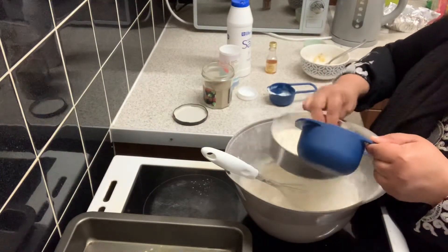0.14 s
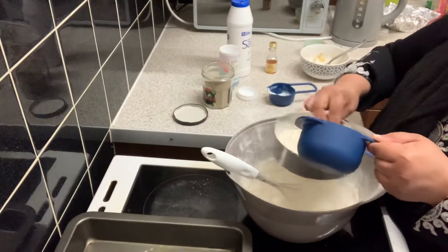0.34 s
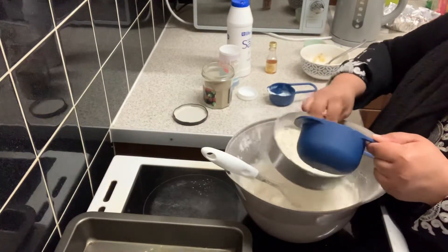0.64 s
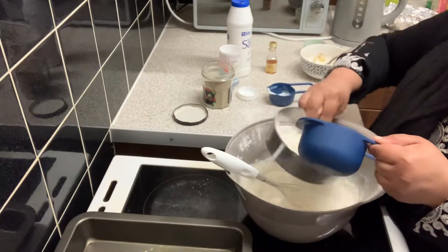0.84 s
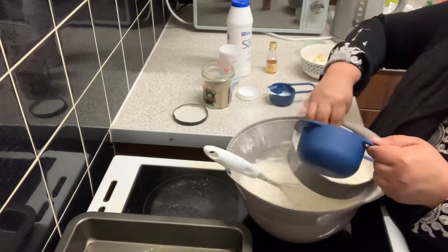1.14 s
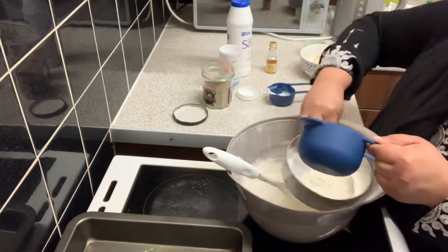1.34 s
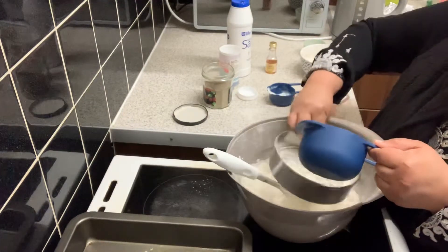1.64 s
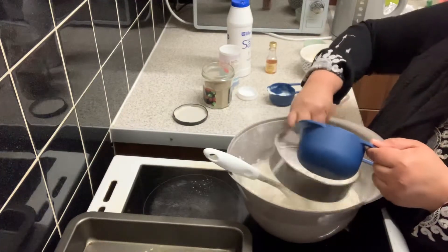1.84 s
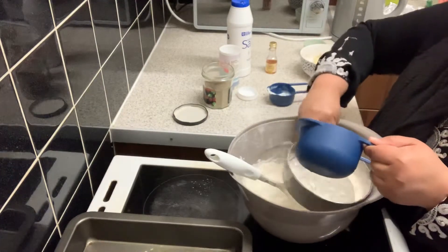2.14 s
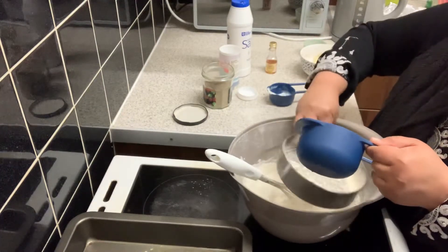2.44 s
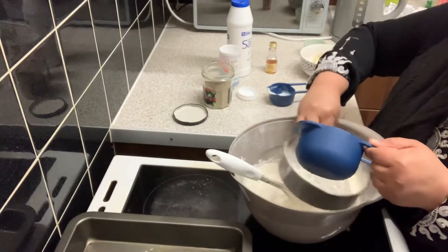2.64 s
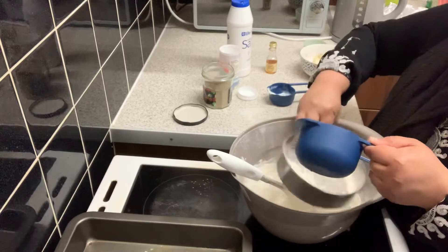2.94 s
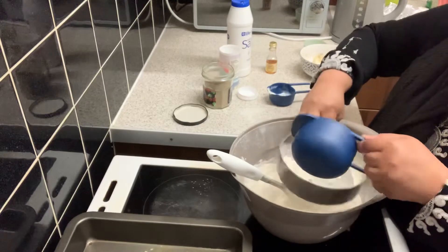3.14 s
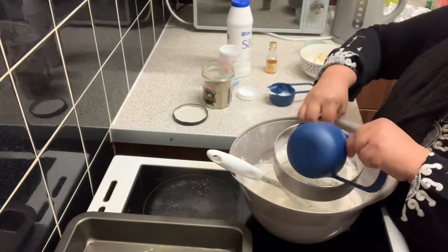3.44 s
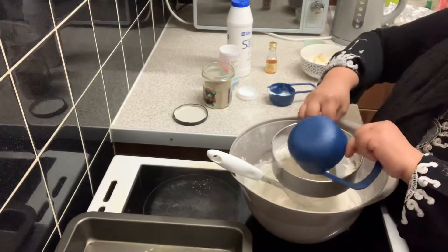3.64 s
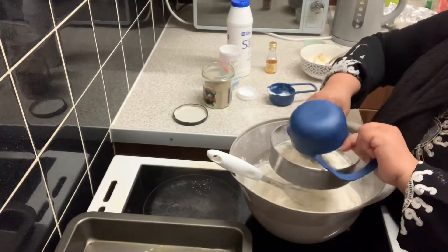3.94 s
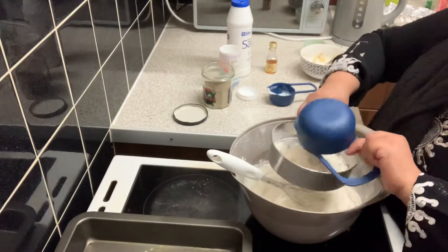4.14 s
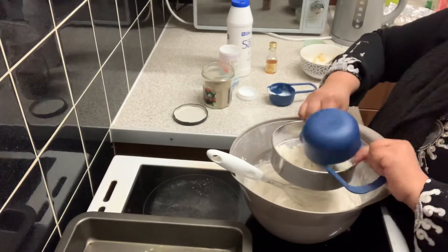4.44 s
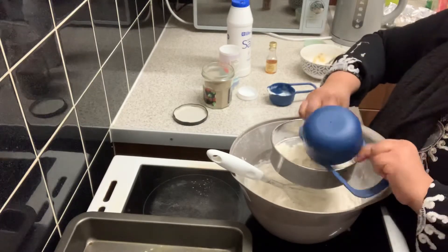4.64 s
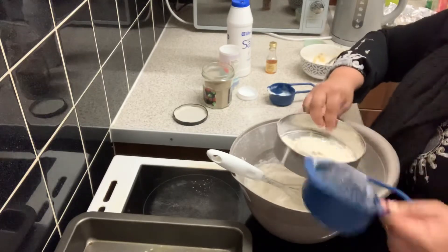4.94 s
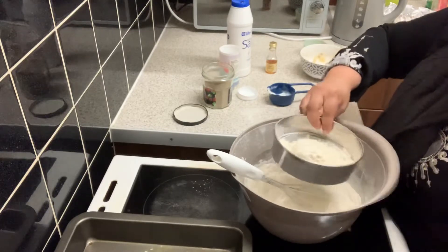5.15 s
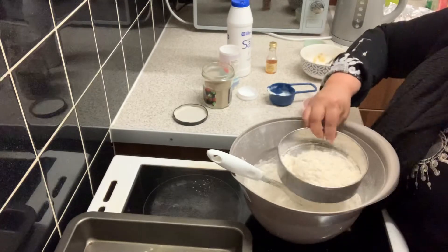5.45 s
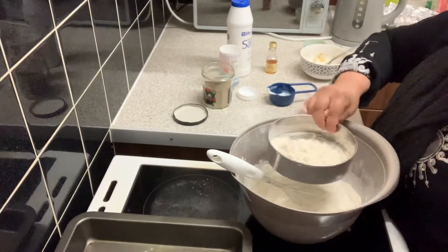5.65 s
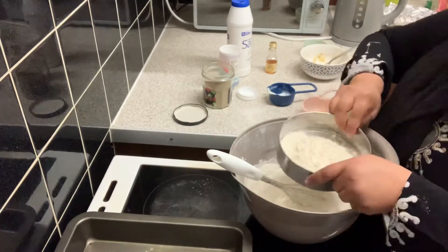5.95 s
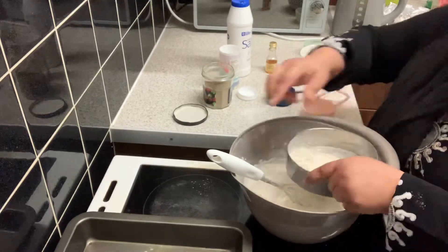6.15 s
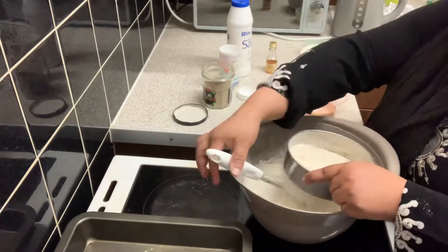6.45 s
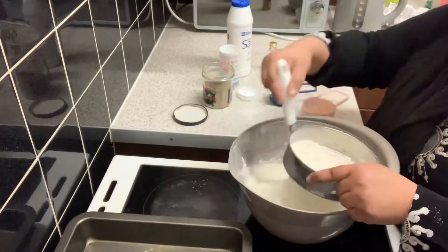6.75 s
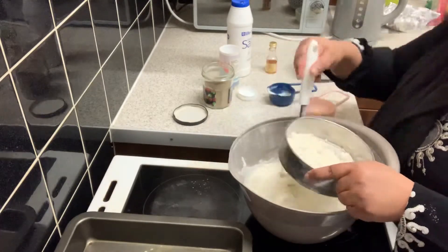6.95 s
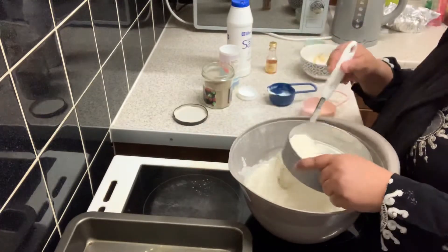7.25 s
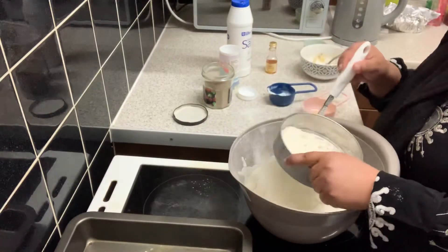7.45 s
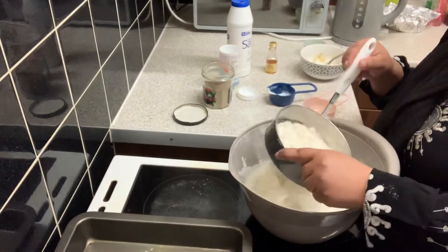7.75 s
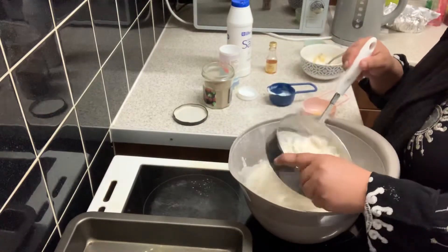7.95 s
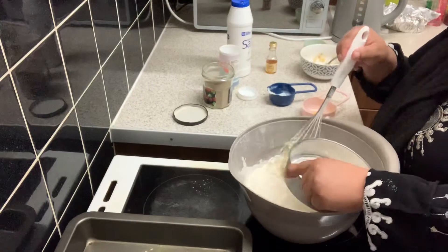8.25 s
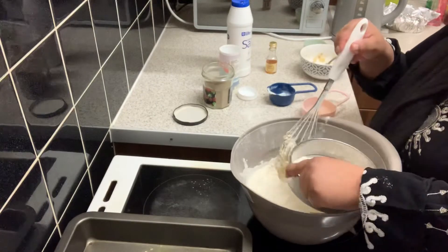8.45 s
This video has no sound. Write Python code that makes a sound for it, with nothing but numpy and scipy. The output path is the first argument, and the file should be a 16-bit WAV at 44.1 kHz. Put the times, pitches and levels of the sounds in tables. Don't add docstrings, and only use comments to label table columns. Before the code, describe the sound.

Close microphone in a small tiled kitchen, with a faint low household hum throughout. From 0 to 1.1 seconds, very quiet back-and-forth flour hiss and soft rubbing through a sieve. At 1.1 a sharp clack with a quick rattle starts the knocking; from 1.3 to 3.05 a plastic pan hits the sieve about every 0.2 seconds, dry and hollow, each blow followed by a low bowl thud, the last one weak. A light tap at 3.3, a pause, an edge slip at 4.25, then two loud taps at 4.43 and 4.6, the second hardest. At 5.2 the pan lands hard on the counter, bouncing and rocking to rest by 5.55. Faint finger nudges and flour rustle until 7.4. A clear whisk tap at 7.57, a light double tap at 7.78, a brief wire scrape at 7.97, then handle knocks at 8.2 and, louder, 8.38, ending in a soft rub near 8.6.

```python
import sys
import numpy as np
from scipy import signal
from scipy.fft import rfft, irfft, next_fast_len
from scipy.io import wavfile
from scipy.ndimage import uniform_filter1d

SR = 44100
rng = np.random.default_rng(int(sys.argv[2]) if len(sys.argv) > 2 else 0)


def to_wav(s):
    ch = np.atleast_2d(s).T
    pcm = np.round(np.clip(ch, -1, 1) * 32767)
    wavfile.write(sys.argv[1], SR, pcm.astype(np.int16))


def undo_db(level):
    steps = np.asarray(level, float) / 20
    return 10 ** steps


N = 378819

# (time [s], crack peak [dB], thud [dB], extra brightness [dB/octave], share to walls [dB])
FIRST_SHAKE = [
    (1.0895, -12, -23.5, -6.5, -4),
    (1.096, -20, -42, -1.5, -6),
    (1.118, -22, -44, 1, -4),
    (1.154, -28.5, -46.5, 1, -7),
]
SHAKES = [
    (1.31, -16.5, -25, 0, -6.5),
    (1.512, -17.5, -34, -0.5, -8),
    (1.693, -11.5, -27, -0.5, -9),
    (1.891, -13, -25.5, -0.5, -8),
    (2.095, -12.5, -31.5, 0.5, -9.5),
    (2.283, -13.5, -31.5, -1, -8.5),
    (2.467, -14.5, -30, 1.5, -7),
    (2.66, -14, -28.5, 0.5, -8.5),
    (2.854, -11.5, -27, 1, -8.5),
    (3.057, -22.5, -38.5, -2.5, -9.5),
]
# (frequency [Hz], level [dB per Hz])
FULL_PAN_COLOUR = [(310, -39), (520, -6), (2820, -4), (6040, -15), (7380, -14), (10700, -22), (13900, -28),
                   (16000, -60)]
PAN_COLOUR = [(310, -30), (520, 1), (664, 1.5), (1110, -3.5), (2550, -8), (6580, -33), (10300, -36),
              (12000, -40.5), (14300, -38), (16000, -70)]
# (frequency [Hz], width [Hz], level [dB])
FULL_PAN_CLACK = [(1640, 2200, 2), (2390, 596, 2), (3100, 780, -1)]
PAN_CLACK = [(1160, 350, 5), (1457, 552, 11.7), (3350, 820, 1.3)]


def shaken_pan():
    first = knocks(FIRST_SHAKE, FULL_PAN_COLOUR, FULL_PAN_CLACK, chatter_s=0.013, chatter_db=-23,
                   broad_db=-4, deep_db=11, land_s=.0012, late_s=0.0055)
    beat = knocks(SHAKES, PAN_COLOUR, PAN_CLACK, chatter_s=0.0031, chatter_db=-20, broad_db=-8, deep_db=5,
                  land_s=0.0008, order=3, rebound_db=-4, clack_sent_db=-8.5, onset_s=0.00079)
    return first + beat


# (time [s], crack peak [dB], thud [dB], extra
# brightness [dB/octave], share to walls [dB])
LIGHT_TAPS = [
    (3.311, -23, -53, -2.2, -5.5),
    (7.409, -43.5, -64.5, -2, -13),
]
SLIP = [
    (4.244, -21.5, -31, -2.2, -4.5),
]
RIM_TAP = [
    (4.428, -8, -47.5, -2, -8.5),
]
HARD_TAP = [
    (4.609, -6, -53, -2, -8),
]
# (frequency [Hz], level [dB per Hz])
LIP_COLOUR = [(240, -25.5), (400, -1), (826, -13.5), (1220, -9), (2180, -11.5), (2800, -7.5), (3370, -25.5),
              (7170, -20), (9920, -22.5), (12500, -35.5), (16000, -42.5)]
EDGE_COLOUR = [(310, -31.5), (520, -8), (2030, -19), (2180, -20.5), (3400, -24.5), (4340, -22.5),
               (10100, -37), (16000, -69)]
RIM_COLOUR = [(260, -18.5), (450, -13), (771, -9.5), (908, -12.5), (1780, -18.5), (3230, -27.5),
              (6930, -22.5), (11200, -20), (14000, -29.5), (16000, -90)]
EMPTY_PAN_COLOUR = [(260, -26.5), (450, -13), (589, -7), (654, -15), (964, 0.5), (2100, -26), (4840, -28),
                    (7360, -26.5), (9770, -24.5), (12200, -39), (14400, -39.5), (16000, -72.5)]
# (frequency [Hz], width [Hz], level [dB])
LIP_CLACK = [(1280, 540, -0.5), (2910, 390, -3), (4240, 710, -6.5)]
EDGE_CLACK = [(2380, 520, -5), (4580, 970, 2), (5200, 510, -12.5)]
RIM_CLACK = [(910, 310, 0.5), (1800, 300, -12), (2780, 170, -17), (4440, 380, -7.5), (10330, 3000, -3.5)]
EMPTY_PAN_CLACK = [(915, 360, 1), (1150, 81.8, -2.5), (1270, 79, -23), (1868, 230, -20.5), (2810, 400, -20),
                   (4700, 1300, -13.5)]


def tapped_rim():
    light = knocks(LIGHT_TAPS, LIP_COLOUR, LIP_CLACK, chatter_s=0.0027, chatter_db=-19, broad_db=-2.5,
                   clack_sent_db=-6.5, ring_db=-31.5, deep_db=8.5)
    slip = knocks(SLIP, EDGE_COLOUR, EDGE_CLACK, chatter_s=0.0059, chatter_db=-20, broad_db=-3.5,
                  deep_db=12.5, clack_sent_db=-8.5)
    rim = knocks(RIM_TAP, RIM_COLOUR, RIM_CLACK, chatter_s=0.0033, chatter_db=-14, broad_db=-6.5,
                 ring_db=-45.5, clack_sent_db=-8, smear_db=-39, deep_db=7.5)
    hard = knocks(HARD_TAP, EMPTY_PAN_COLOUR, EMPTY_PAN_CLACK, chatter_s=0.005, chatter_db=-25, broad_db=-4,
                  clack_sent_db=-5.5, ring_db=-42.5, smear_db=-41.5, deep_db=7.5)
    return light + slip + rim + hard


# (time [s], crack peak [dB], thud [dB], extra brightness [dB/octave], share to walls [dB])
SET_DOWN = [
    (5.214, -10.5, -38, -3.5, -5),
]
BOUNCES = [
    (5.24, -34, -43.5, 4, 8),
    (5.268, -18, -37, 0, 3),
    (5.299, -27.5, -50.5, -2.5, 4.5),
    (5.338, -31, -53.5, -2.5, 3.5),
    (5.349, -28.5, -54, 0.5, 1),
    (5.398, -43, -68, -4.5, 10.5),
    (5.42, -42, -69, 3.5, -5),
    (5.492, -44, -51, -1, 3),
    (5.509, -43, -61, -5, 0.5),
    (5.558, -50, -64, 0, -8.5),
]
# (frequency [Hz], level [dB per Hz])
BASE_COLOUR = [(260, -30.5), (450, -5), (485, -8.5), (1170, 3), (1490, -20), (1860, -14.5), (2400, -13.5),
               (5540, -17), (10200, -26.5), (13600, -27.5), (16000, -51.5)]
ROCKING_COLOUR = [(240, -36), (400, -5), (446, -6.5), (1230, -6.5), (1560, -20.5), (3370, -18.5),
                  (6640, -28), (10100, -33), (14100, -43), (16000, -53)]
# (frequency [Hz], width [Hz], level [dB])
BASE_CLACK = [(1210, 110, 3), (1930, 72, -12.5), (3250, 550, -10.5), (5380, 1900, -9.5), (8100, 140, -10.5)]
BOUNCE_CLACK = [(1220, 200, -8), (1786, 690, 5), (3295, 360, -1.5), (5270, 490, -4)]


def pan_set_down():
    base = knocks(SET_DOWN, BASE_COLOUR, BASE_CLACK, chatter_s=0.0033, chatter_db=-9, broad_db=-2.5,
                  deep_db=-8.5, clack_sent_db=-5)
    bounces = knocks(BOUNCES, ROCKING_COLOUR, BOUNCE_CLACK, chatter_s=0.002, chatter_db=-17.5, broad_db=1,
                     clack_sent_db=-6, deep_db=-12.5)
    return base + bounces


# (time [s], crack peak [dB], thud [dB], extra brightness [dB/octave], share to walls [dB])
WHISK_TAPS = [
    (7.574, -22, -51.5, -0.78, -4.5),
    (7.777, -28.5, -60, 1, -4),
    (7.785, -25.5, -58.5, 0.14, -4),
]
WHISK_SCRAPE = [
    (7.969, -33, -66, -4.5, -6),
    (7.975, -30, -49.5, -2.5, 0.5),
    (7.992, -30, -51.5, -3, 1),
]
LAST_KNOCKS = [
    (8.225, -31.5, -46, 4.4, -7),
    (8.376, -16.5, -35, 4.7, -6),
    (8.408, -29.5, -41, 2.5, -11),
    (8.584, -51, -47, 0.42, 0),
]
# (frequency [Hz], level [dB per Hz])
HOOP_COLOUR = [(260, -47), (450, -5), (674, -9), (1750, -4), (2010, -4.5), (3000, -9.5), (3640, -11),
               (6730, -18.5), (9770, -17), (12800, -29), (14600, -17), (16000, -77)]
WIRES_COLOUR = [(260, -26), (450, -7), (818, -14.5), (1810, -6.5), (4700, -17), (5620, -19), (7030, -15),
                (9770, -10), (12600, -22), (16000, -33.5)]
HANDLE_COLOUR = [(310, -34), (520, 10), (1160, 2), (1300, 10.5), (2000, -5.5), (3170, -13.5), (6580, -37.5),
                 (10400, -52.5), (12400, -57), (16000, -48)]
# (frequency [Hz], width [Hz], level [dB])
HOOP_CLACK = [(1320, 140, -9.5), (1670, 310, -7.5), (2945, 290, -2.5), (4760, 820, -9), (6270, 280, -15)]
WIRE_CLACK = [(1790, 230, -3.5), (4350, 1000, -14), (5420, 680, 2.5)]
HANDLE_CLACK = [(1033, 450, 8.5), (1257, 200, 8.5), (1772, 130, -5.5), (2655, 730, 4.5), (3070, 620, -3)]


def whisk():
    taps = knocks(WHISK_TAPS, HOOP_COLOUR, HOOP_CLACK, chatter_s=0.012, chatter_db=-17.5, broad_db=-11,
                  deep_db=7, clack_sent_db=-9)
    scrape = knocks(WHISK_SCRAPE, WIRES_COLOUR, WIRE_CLACK, chatter_s=0.011, chatter_db=-14, broad_db=3.5,
                    deep_db=28)
    handle = knocks(LAST_KNOCKS, HANDLE_COLOUR, HANDLE_CLACK, chatter_s=0.0021, chatter_db=-12.5,
                    broad_db=-8.5, deep_db=18.5, order=3)
    return taps + scrape + handle


# (time [s], crack peak [dB], thud [dB], extra brightness [dB/octave], share to walls [dB])
NUDGES = [
    (5.989, -69.5, -73.5, 4, 2),
    (6.316, -42.5, -46.5, -0.5, 1.5),
    (7.288, -53.5, -60.5, -1.5, -4.5),
]
SCUFF = [
    (6.075, -69, -75, 0, 0),
    (6.1, -69.5, -70, 0, 0),
]
# (frequency [Hz], level [dB per Hz])
FINGERS_COLOUR = [(260, -40), (450, 8), (1070, -2.5), (1700, -7.5), (2910, -3), (6530, -41.5), (12000, -40),
                  (16000, -48)]
# (frequency [Hz], width [Hz], level [dB])
FINGER_CLACK = [(986, 297, -2), (2730, 2050, -5)]
SCUFF_CLACK = [(2050, 250, 0.37), (2300, 210, -2.5)]


def fingers():
    nudges = knocks(NUDGES, FINGERS_COLOUR, FINGER_CLACK, chatter_s=0.0052, chatter_db=-21, broad_db=-3.5,
                    deep_db=24)
    scuff = knocks(SCUFF, FINGERS_COLOUR, SCUFF_CLACK, chatter_s=0.015, chatter_db=-3, broad_db=-4,
                   clack_sent_db=-5, deep_db=3)
    return nudges + scuff


def knocks(events, colour, modes, chatter_s, chatter_db, broad_db, deep_db, smear_db=-36, clack_sent_db=-12,
           ring_db=None, land_s=0.00057, order=2, rebound_db=-40, onset_s=.0003, late_s=.009):
    rebound_s = 0.0068
    out = np.zeros((5, N))
    t = np.arange(int(.08 * SR)) / SR
    lead = np.arange(int(0.014 * SR))
    rise = (lead / len(lead)) ** 0.72
    for s, peak_db, boom_db, tilt_db, wall_db in events:
        body = click(colour, tilt_db)
        chatter = (t / chatter_s) ** .5 * np.exp(-t / chatter_s)
        contact = undo_db(chatter_db) * rng.standard_normal(len(t)) * chatter
        landing = rng.standard_normal(len(t)) * t * np.exp(-t / land_s)
        landing = landing / np.sqrt(np.sum(landing ** 2))
        landing = landing + undo_db(rebound_db) * np.roll(landing, int(rebound_s * SR))
        broad = unit(signal.fftconvolve(contact + landing, body)[:len(t)])
        contact[0] = 1
        voice = []
        for hz, width_hz, db in modes:
            detune, strength = rng.standard_normal(2)
            voice.append((hz * (1 + 0.015 * detune), width_hz, db + 0.67 * strength))
        clack = unit(swell(contact, voice, order))
        crack = clack + undo_db(broad_db) * broad
        size = undo_db(peak_db) / np.abs(crack).max()
        smear = signal.fftconvolve(rng.standard_normal(len(lead)) * rise, band(body, 300, 6700))
        smear = unit(smear[:len(lead)])
        add(out[0], size * crack, s + onset_s)
        add(out[0], undo_db(peak_db + smear_db) * smear, s - len(lead) / SR)
        add(out[1], undo_db(boom_db) * thud(deep_db, late_s), s)
        if ring_db:
            add(out[0], undo_db(peak_db + ring_db) * hoop(), s)
        impulse = 1. * (t == 0)
        sent = unit(np.pad(body, (0, len(t) - len(body))))
        sent = sent + undo_db(clack_sent_db) * unit(swell(impulse, voice, order))
        for feed, share in zip(out[2:], unit(rng.standard_normal(3))):
            add(feed, undo_db(wall_db + 6) * share * size * sent, s)
    return out


def click(colour, tilt_db, size=1024):
    hz = np.arange(size // 2 + 1) * SR / size
    gain_db = at(colour, hz) + (4 + tilt_db) * np.log2((hz + 1) / 1500)
    cep = irfft(np.log(undo_db(np.maximum(gain_db, -90))), size)
    cep[1:size // 2] *= 2
    cep[size // 2 + 1:] = 0
    return irfft(np.exp(rfft(cep)), size)


def swell(contact, modes, order):
    out = 0
    for hz, width_hz, db in modes:
        x = contact
        for k in range(order):
            x = ring(x, hz, width_hz * 1.255 ** k)
        out = out + undo_db(db) / width_hz ** .5 * x
    return out


# (frequency [Hz], width [Hz], t60 [s])
HOOP_RING = (2830, 260, .48)


def hoop():
    hz, width_hz, t60 = HOOP_RING
    t = np.arange(SR // 2) / SR
    tone = ring(ring(rng.standard_normal(len(t)), hz, width_hz), hz, 2 * width_hz)
    return unit(tone) * 1000. ** (-t / t60)


# (frequency [Hz], level [dB], t60 [s])
BOWL = [(61, -12, 1), (80.5, -8.5, 0.64), (115.16, -0.5, 0.34), (131.6, 5.5, 0.099), (154.6, -2.5, 0.046),
        (176, -4.5, 0.062), (182, -9.5, 0.54), (263.3, -11.5, 0.22), (309.6, -12.5, 0.15), (417, -18, 0.2)]


def thud(deep_db, late_s=.009, push_s=0.0049, settle_s=0.082, settle_db=-14):
    t = np.arange(int(.3 * SR)) / SR
    lag = np.maximum(t[:9000] - late_s, 0)
    shake = band(unit(rng.standard_normal(9000)), 89, 340)
    blow = lag / push_s * np.exp(-lag / push_s)
    settle = np.minimum(lag / push_s, 1) * np.exp(-lag / settle_s)
    push = blow * (1 + 24 * shake) + 12 * undo_db(settle_db) * shake * settle
    body = 0
    for hz, db, t60 in BOWL:
        wobble, size = rng.standard_normal(2)
        db = db + 0.88 * size + deep_db * (hz < 100)
        tone = np.sin(2 * np.pi * hz * (1 + 0.037 * wobble) * t)
        body = body + undo_db(db) * np.exp(-np.log(1000) * t / t60) * tone
    y = signal.fftconvolve(np.diff(push), body)
    return y / np.sqrt(np.mean(y[int(late_s * SR):int(.05 * SR)] ** 2))


# (time [s], thud level [dB], extra deep sway [dB])
ROCKS = [
    (1.163, -22, 9.5),
    (6.399, -54.5, 22),
    (6.5, -52.5, 17),
    (8.014, -30, 22.5),
    (8.451, -66, 0),
    (8.519, -44.5, -10),
]


def rocking_bowl():
    out = np.zeros(N)
    for s, db, deep_db in ROCKS:
        add(out, undo_db(db - 11) * thud(deep_db, late_s=.001, push_s=.006), s)
    return out


# (middle time [s], hiss level [dB], rub level [dB])
SWINGS = [
    (0.01, -70.5, -72.5),
    (0.125, -71.5, -76),
    (0.212, -72, -92),
    (0.329, -74.5, -73.5),
    (0.41, -76, -95),
    (0.545, -73, -74),
    (0.742, -69.5, -63),
    (0.83, -83, -72),
    (0.955, -75, -78),
    (1.07, -71.5, -93),
]
# (middle time [s], length [s], hiss level [dB], rub level [dB])
HANDLING = [(4.044, 0.086, -75, -67.5), (5.847, 0.082, -77.5, -84.5), (5.99, .06, -83.5, -73),
            (6.113, 0.12, -82, -75.5), (6.184, 0.12, -75, -82), (6.262, 0.1, -76, -83),
            (6.348, 0.16, -76, -73), (6.53, 0.07, -77.5, -81), (6.601, 0.2, -77.5, -66),
            (6.717, 0.11, -76.5, -91.5), (6.89, 0.096, -74, -82), (7.06, 0.13, -77.5, -95),
            (7.181, 0.13, -80.5, -75.5), (7.27, 0.12, -68.5, -73.5), (7.442, 0.17, -71.5, -66.5),
            (8.17, 0.18, -72, -70.5), (8.557, 0.086, -62, -58), (8.6, 0.045, -68, -37)]
# (frequency [Hz], width [Hz], level [dB])
MESH = [(2690, 180, 2.5), (2953, 240, -3.5), (4230, 650, -7), (6400, 1900, -16.5)]


def flour():
    swing_s = 0.13
    size = np.zeros((2, N))
    strokes = [(s, swing_s, *db) for s, *db in SWINGS] + HANDLING
    for s, length_s, hiss_db, rub_db in strokes:
        start, stop = int((s - length_s / 2) * SR), int((s + length_s / 2) * SR)
        i = np.arange(max(start, 0), min(stop, N))
        speed = np.abs(np.cos(np.pi * (i / SR - s) / length_s))
        size[:, i] += undo_db(np.array([[hiss_db], [rub_db]])) * speed ** 2.2
    grain_db = 4 * rng.standard_normal(N) + 2.2 * walk(60)
    grains = rng.standard_normal((2, N)) * undo_db(grain_db)
    mesh = sum(undo_db(db) * ring(grains, hz, width_hz) for hz, width_hz, db in MESH)
    hiss = unit(mesh) + undo_db(2.5) * unit(band(grains, 1700, 12000))
    hiss = hiss + undo_db(-19) * unit(band(grains, 7700, 17000))
    rub = unit(band(grains, 547, 2700)) + undo_db(-12.5) * unit(ring(grains, 3200, 430))
    return undo_db(-3.5) * size[0] * hiss + undo_db(-4.5) * size[1] * rub


# (frequency [Hz], t60 [s], level [dB])
WALLS = [(349.5, .5, -0.5), (723, 0.18, -3), (1350, 0.59, -14), (2610, 0.3, -8), (4880, 0.49, -18),
         (8200, 0.24, -5), (11400, 0.1, -11.5), (14000, 0.2, -8), (15000, 0.05, -20)]


def kitchen():
    t = np.arange(int(.6 * SR)) / SR
    tail = 0
    for hz in 250 * 2 ** np.arange(0, 6, .5):
        fade = np.exp(-np.log(1000) * t / at(WALLS, hz)) * (1 - np.exp(-t / 0.00036))
        noise = band(rng.standard_normal(len(t)), hz / 1.347, hz * 1.246)
        tail = tail + undo_db(at(WALLS, hz, column=2)) * noise * fade
    return tail * undo_db(-31.5)


# (frequency [Hz], level [dB per Hz])
HUM = [(15, -35), (25, -6), (72, 0.5), (123, -9), (180, -3), (249, -17), (309, -14.5), (439, -15.5),
       (503, -21.5), (936, -37.5), (2350, -37), (5140, -35), (8590, -53.5), (12200, -33), (16000, -58)]


def hum():
    hum_db, tone_sway_db = -59.5, 1.8
    out, white, drift = 0, rng.standard_normal((2, 2, N)), walk(1.5)
    for k, hz in enumerate(30 * 2 ** np.arange(0, 9.2, .5)):
        noise = band(white[k % 2], hz / 1.4, hz * 1.19)
        out = out + undo_db(at(HUM, hz) + 1.5 * walk(6.4) + 0.91 * drift) * noise
    out = unit(out)
    for hz, width_hz, db in [(108.5, 7.3, -2.5), (194, 11, -5.0), (304.9, 12.0, -1.5), (9000, 34, -22.0)]:
        tone = ring(ring(white[0, :, ::-1], hz, width_hz), hz, 10 * width_hz)
        out = out + undo_db(db + tone_sway_db * walk(2.5)) * unit(tone)
    return undo_db(hum_db - 6) * out


# (frequency [Hz], likeness [0-1])
LIKENESS = [(60, .95), (200, .88), (400, .4), (800, .15), (1300, .05), (2500, .15), (5000, .1), (7000, .7),
            (7900, .996), (9500, .996), (10300, .95), (12000, .8)]
# (frequency [Hz], phase [rad])
PORT_PHASE = [(1, 0), (340, .4), (780, 2.6), (1550, -1.1), (2500, -1.3), (3300, -.6), (4740, -2.0),
              (6370, -1.6), (7800, -3.1), (9500, -3.18), (10200, -5.0), (13600, -7.0), (16000, -8.5)]
# (frequency [Hz], level [dB])
PORT_BALANCE = [(60, 1.5), (110, -5.5), (200, -3), (380, -5), (700, 1.5), (1290, -1.5), (2380, 1),
                (4400, 0), (8120, 0.8), (15000, 0)]


def ports(same, other):
    size = next_fast_len(N + SR // 4)
    hz = np.arange(size // 2 + 1) * SR / size
    like = np.clip(at(LIKENESS, hz), 0, 1)
    turn = np.exp(.5j * at(PORT_PHASE, hz)) * undo_db(at(PORT_BALANCE, hz) / 2)
    a = rfft(same, size)
    b = np.sqrt((1 - like) / (1 + like)) * rfft(other, size)
    return np.array([irfft((a + b) * turn, size)[:N], irfft((a - b) / turn, size)[:N]])


def at(table, hz, column=1):
    rows = np.array(table, float)
    return np.interp(np.log(hz + 1), np.log(rows[:, 0] + 1), rows[:, column])


def unit(x):
    return x / np.sqrt(np.mean(x ** 2))


def band(x, lo_hz, hi_hz):
    return signal.sosfilt(signal.butter(2, [lo_hz, min(hi_hz, .45 * SR)], "band", fs=SR, output="sos"), x)


def ring(x, hz, width_hz):
    return signal.lfilter(*signal.iirpeak(hz, hz / width_hz, SR), x)


def add(out, x, s):
    i = int(s * SR)
    out[i:i + len(x)] += x[:max(len(out) - i, 0)]


def walk(rate):
    k = int(SR / rate)
    steps = np.repeat(rng.standard_normal(N // k + 1), k)
    return 1.1 * uniform_filter1d(uniform_filter1d(steps, k), k)[:N]


def scene():
    near, low, *feeds = shaken_pan() + tapped_rim() + pan_set_down() + whisk() + fingers()
    low = low + rocking_bowl()
    size = next_fast_len(N + SR)
    sent = rfft(np.array(feeds), size)
    tails = []
    for _ in range(2):
        echoes = sum(feed * rfft(kitchen(), size) for feed in sent)
        tails.append(irfft(echoes, size)[:N])
    same, other = np.array(tails) + flour() + hum()
    heard = ports(same + near + low, other + np.roll(low, 300))
    return heard + undo_db(-12) * band(near, 6800, 12000)


def top_cut(x):
    return signal.sosfilt(signal.butter(12, 16530, fs=SR, output="sos"), x)


def record(dry):
    dry = signal.sosfilt(signal.butter(2, 42., "high", fs=SR, output="sos"), dry)
    dry = signal.sosfilt(signal.butter(8, 15200, fs=SR, output="sos"), dry)
    return top_cut(dry)


dry = scene()
out = record(dry)
to_wav(out)
```